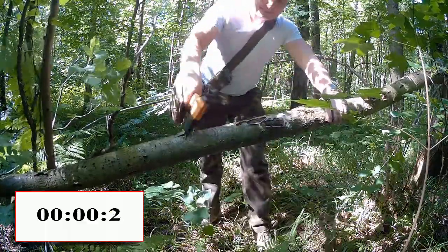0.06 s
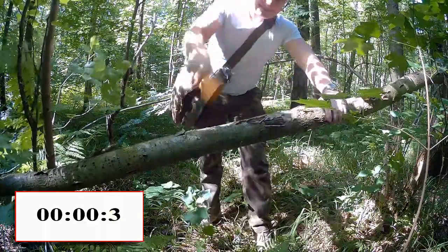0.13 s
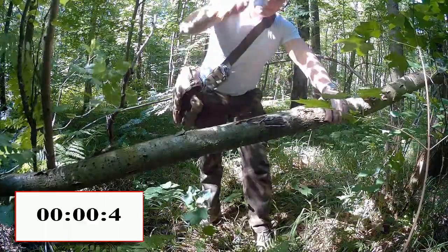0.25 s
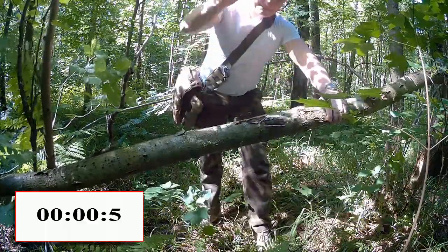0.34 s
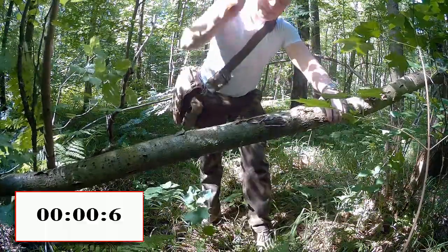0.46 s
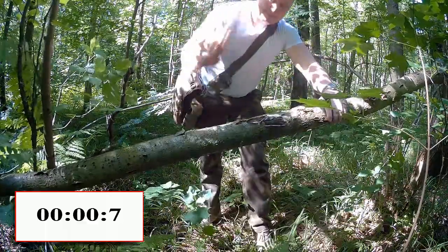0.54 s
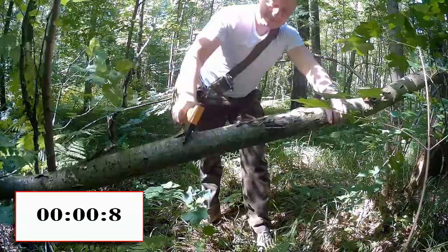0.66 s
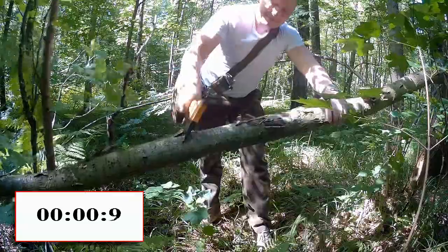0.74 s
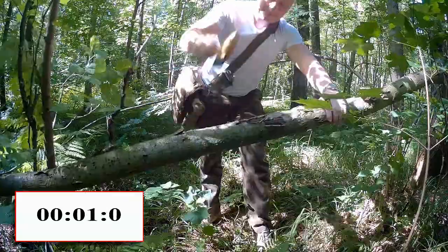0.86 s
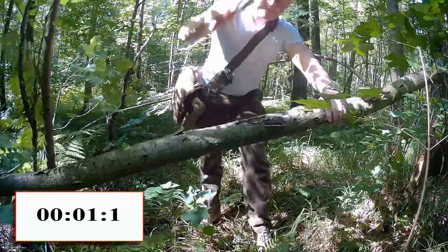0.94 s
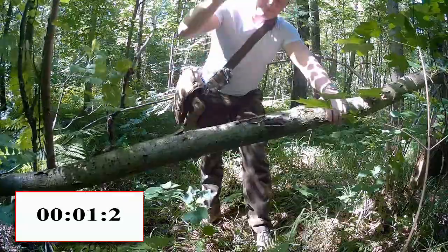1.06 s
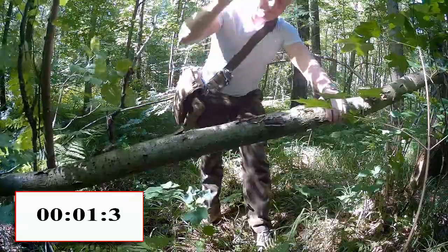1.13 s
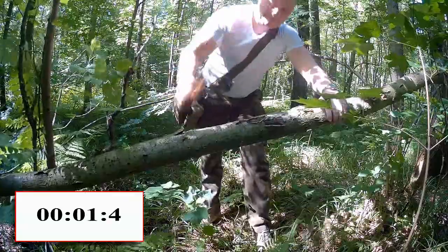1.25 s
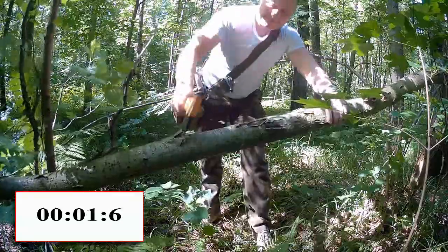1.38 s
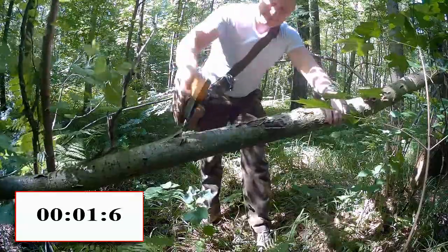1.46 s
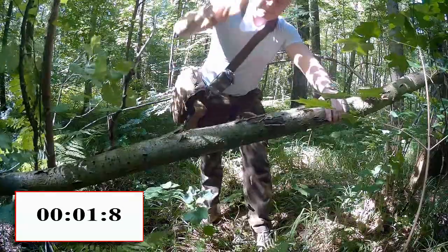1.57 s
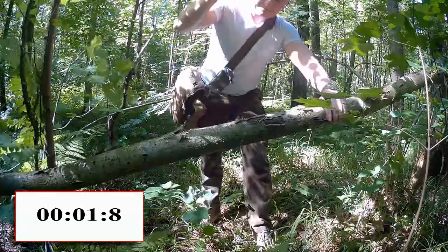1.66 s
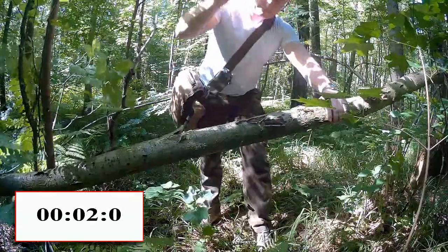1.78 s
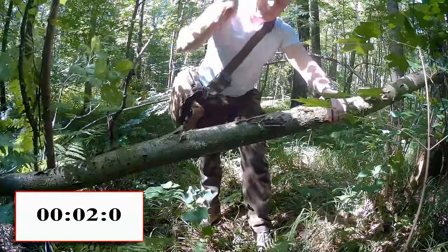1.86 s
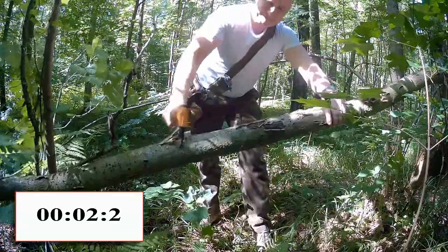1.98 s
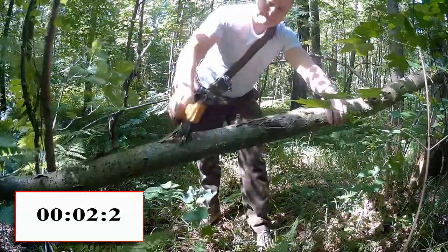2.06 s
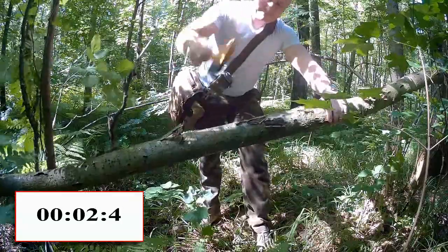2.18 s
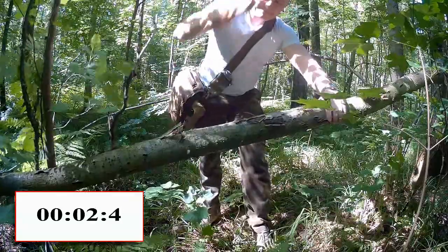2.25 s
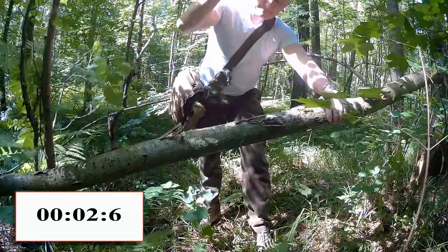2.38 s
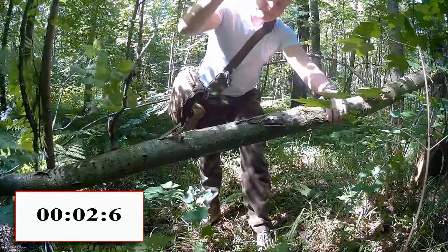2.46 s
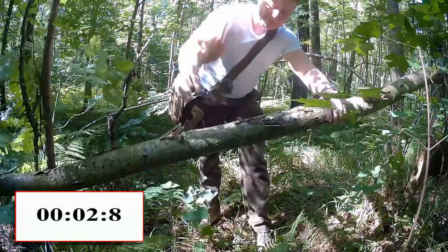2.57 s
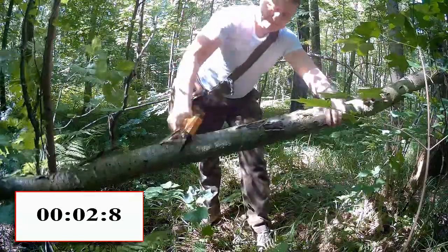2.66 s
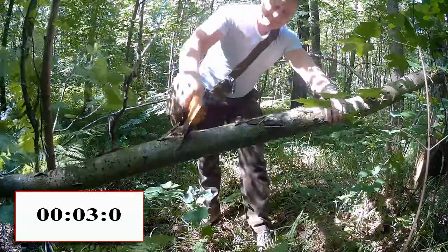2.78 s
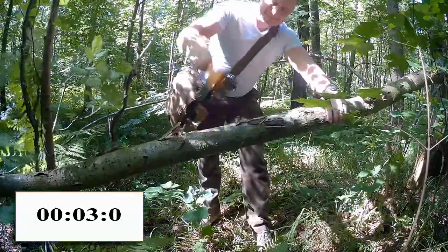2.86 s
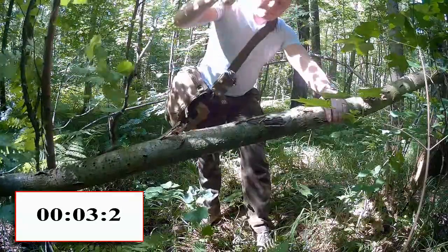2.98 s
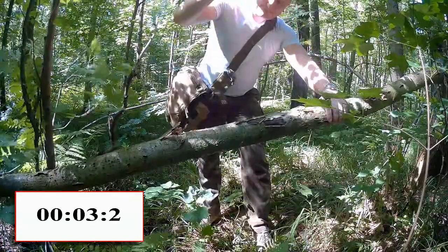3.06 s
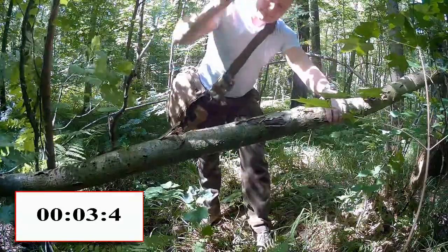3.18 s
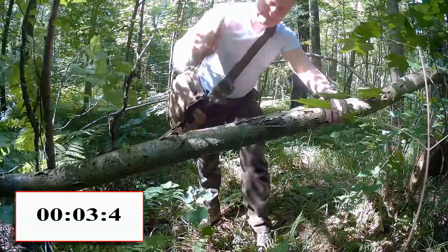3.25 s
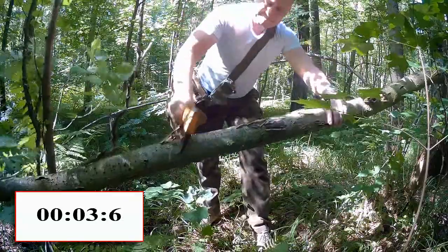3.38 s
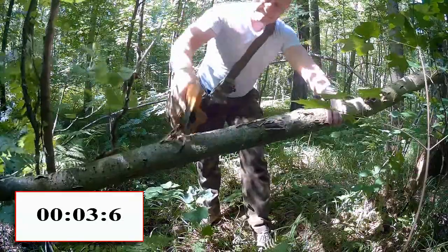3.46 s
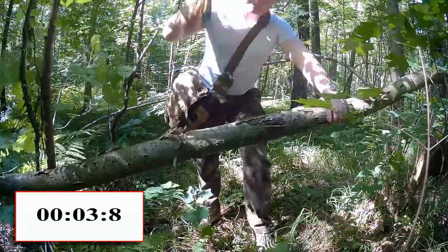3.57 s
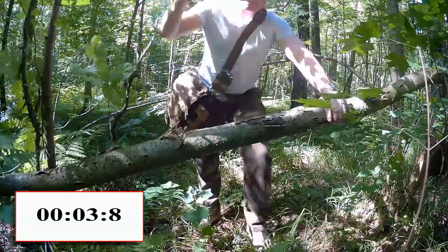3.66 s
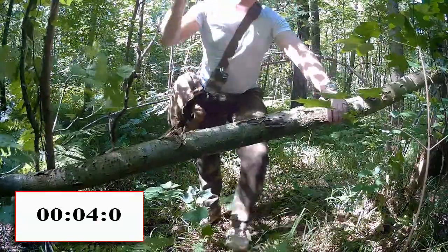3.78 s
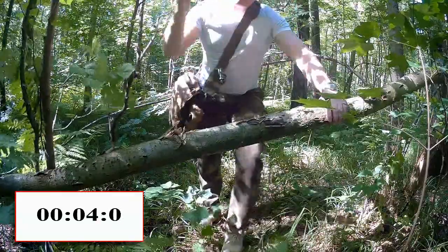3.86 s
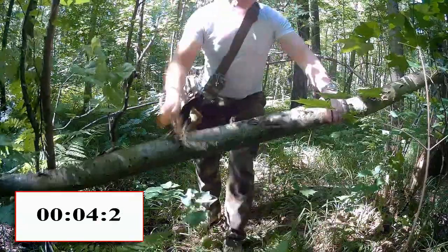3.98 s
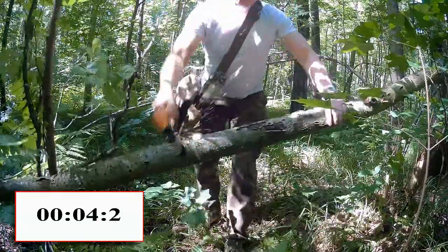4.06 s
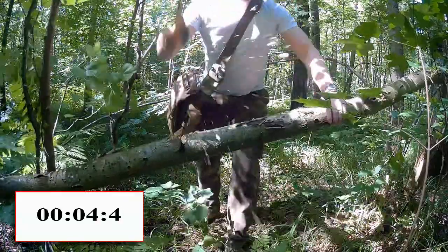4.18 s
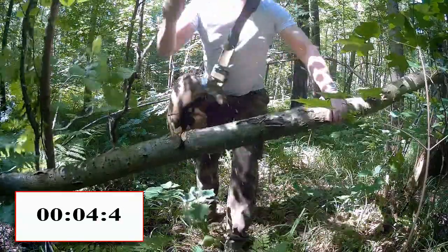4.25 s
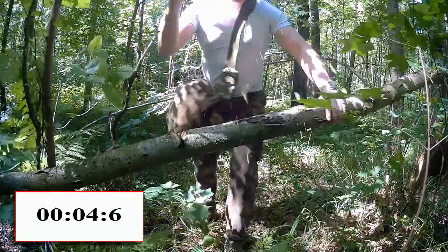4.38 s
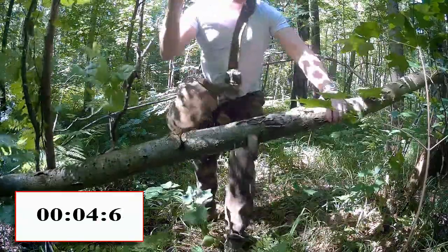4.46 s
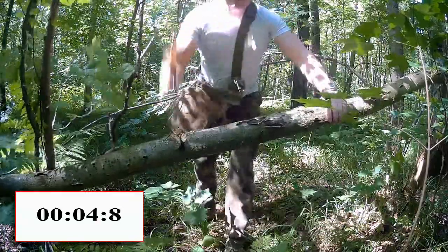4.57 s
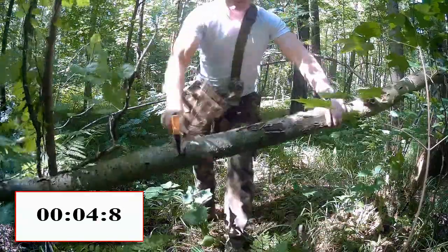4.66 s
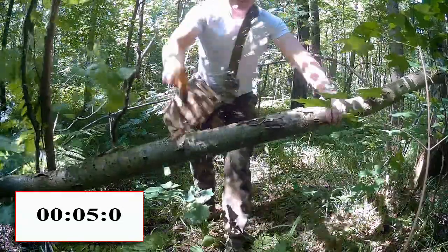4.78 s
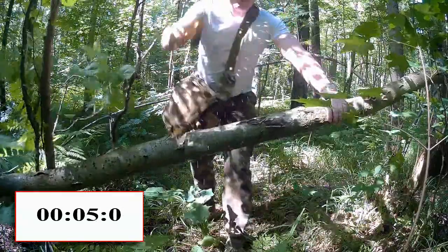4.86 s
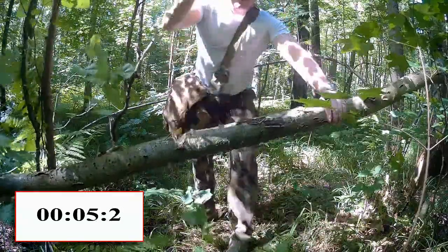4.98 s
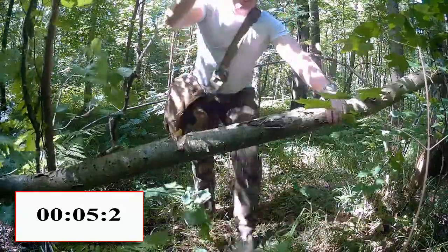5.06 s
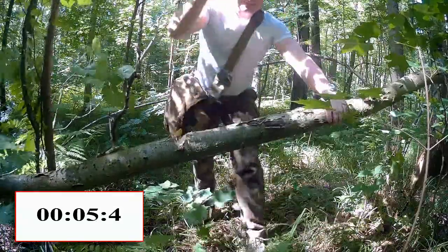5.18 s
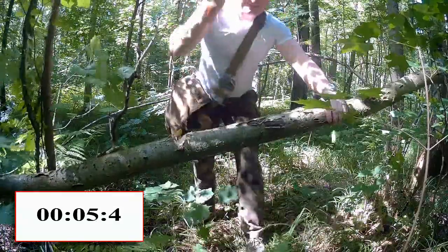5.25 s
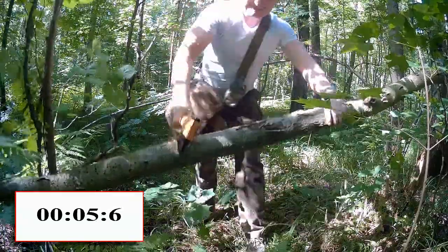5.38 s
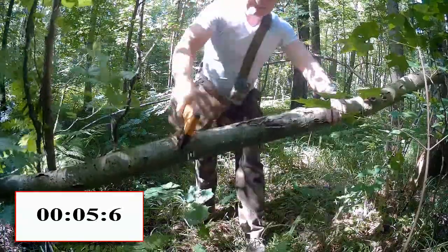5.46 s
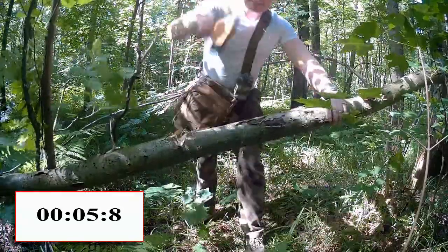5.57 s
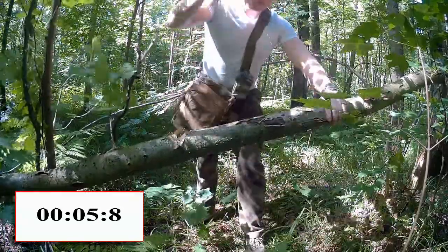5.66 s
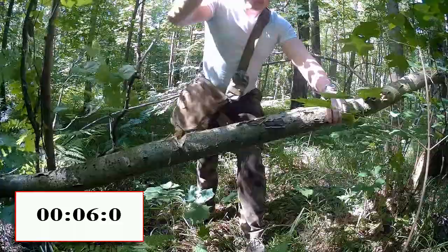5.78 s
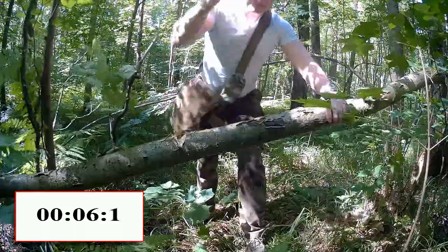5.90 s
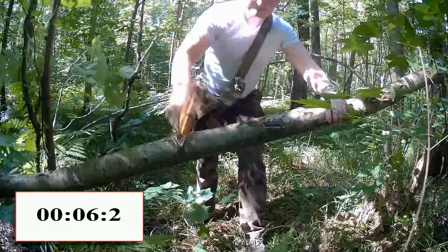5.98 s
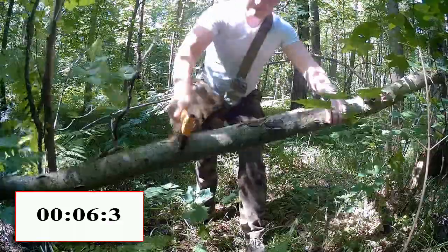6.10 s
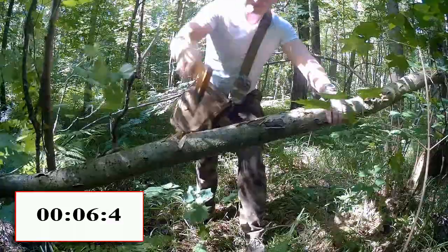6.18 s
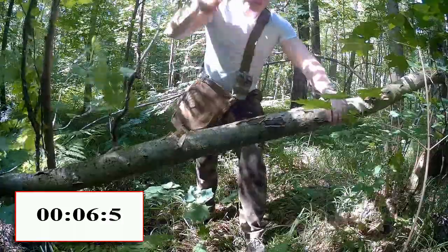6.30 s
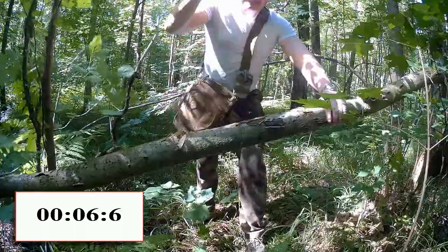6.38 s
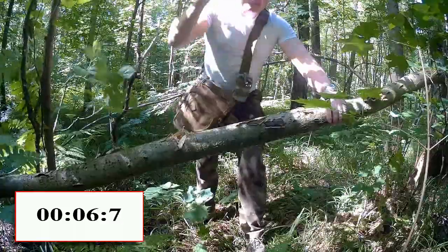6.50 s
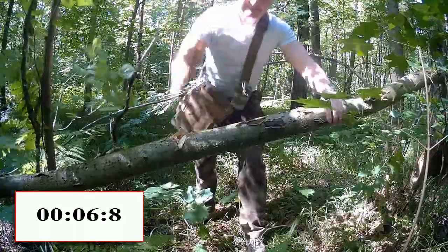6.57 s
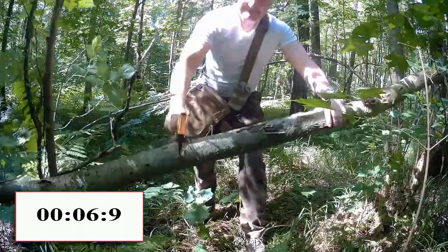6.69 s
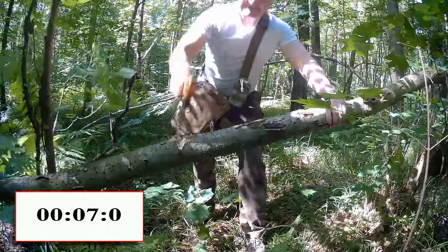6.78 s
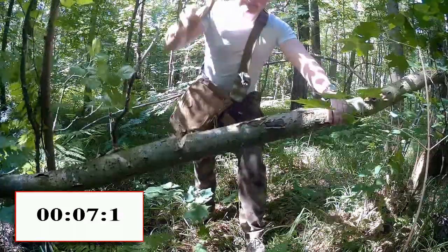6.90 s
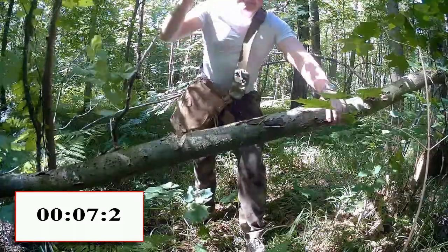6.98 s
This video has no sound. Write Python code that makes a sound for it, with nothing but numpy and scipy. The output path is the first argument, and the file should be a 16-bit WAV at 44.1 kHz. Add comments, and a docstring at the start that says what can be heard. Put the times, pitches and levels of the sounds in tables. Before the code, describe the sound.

In a quiet forest, a hatchet hits a fallen log close to a small camera microphone. The echo of an earlier blow fades first, then ten regular cracking knocks follow, loud enough to distort and briefly duck the sound. Trunks echo each blow, leaves crackle, and chips tick into the litter over faint air, distant traffic hum and a thin high pulsing tone.

```python
"""Forest floor, a small camera's microphone close to a fallen log: an earlier blow is still dying away at the start.
Air, a far traffic hum and a thin pulsing tone run throughout. From 0.6 s a hatchet lands ten blows, about 0.7 s apart.
Each cracks the wood and rings the log's damped modes; then noise echoes among the trunks and the leaves crackle.
Chips land in the litter as short bursts. The blows overload the microphone and its gain ducks a moment late."""
import sys
import numpy as np
from scipy import signal
from scipy.fft import rfft, irfft, next_fast_len
from scipy.io import wavfile
from scipy.ndimage import uniform_filter1d

SR = 44100
rng = np.random.default_rng(int(sys.argv[2]) if len(sys.argv) > 2 else 0)


def file_out(sig):
    """Save sig as 16-bit WAV at sys.argv[1]."""
    # one column per channel
    cols = np.atleast_2d(sig).T
    # limit, then scale
    lim = np.clip(cols, -1, 1)
    pcm = np.round(lim * 32767).astype(np.int16)
    wavfile.write(sys.argv[1], SR, pcm)


def magnitude_from_level(level_db):
    """Linear magnitude for a level in decibels (20 dB per decade)."""
    exponent = np.asarray(level_db, float) / 20
    return 10 ** exponent


N = 310023
T = np.arange(N) / SR


def unit(x):
    """Brings a sound to rms 1."""
    return x / np.sqrt(np.mean(x ** 2) + 1e-20)


def along(points, hz):
    """Reads (f/Hz, value) points on a log frequency axis."""
    f, v = np.transpose(points)
    return np.interp(np.log(hz + 1), np.log(f + 1), v)


def coloured(x, spectrum):
    """Filters x through a (f/Hz, level/dB) spectrum and brings it to rms 1."""
    size = next_fast_len(len(x) + 4096)
    gain = magnitude_from_level(along(spectrum, np.fft.rfftfreq(size, 1 / SR)))
    return unit(irfft(rfft(x, size) * gain, size)[:len(x)])


def patchy(size, patchy_db):
    """White noise with patches of random gain in time and frequency."""
    z = signal.stft(rng.standard_normal(size + 512), nperseg=256)[2]
    field = uniform_filter1d(rng.standard_normal(z.shape), size=5, axis=0)
    field = uniform_filter1d(field, size=9, axis=1)
    return signal.istft(z * magnitude_from_level(patchy_db * unit(field)), nperseg=256)[1][:size]


def add(out, s, sound):
    """Mixes a sound in from time s on, trimmed to the length of the scene."""
    i = round(s * SR)
    part = sound[max(-i, 0):][:N - max(i, 0)]
    out[max(i, 0):][:len(part)] += part


# Air of the forest all around: f/Hz, relative level/dB per Hz
AIR_SPECTRUM = [(15, -35), (25, 1), (65, -1.5), (110, -7), (300, -6.5), (550, -3.5), (900, -2),
                (1300, -5.5), (1750, -10), (2150, -16), (2900, -20), (3900, -15.5), (5000, -18),
                (8000, -21.5), (11300, -25.5), (15200, -32), (16500, -68)]


def forest_air():
    """Diffuse, slightly patchy noise, strongest in the lows."""
    return magnitude_from_level(-41) * coloured(patchy(N, patchy_db=1.03), AIR_SPECTRUM)


# Far traffic coming and going: t/s, hum level/dB
TRAFFIC_LEVEL = [(0, -47), (.5, -46), (1.1, -55.5), (1.7, -55.5), (2.4, -50), (3, -45), (3.5, -46.5),
                 (4.2, -62), (5, -48.5), (5.7, -55), (6.3, -48.5), (7.03, -59)]
# Colour of that hum: f/Hz, relative level/dB per Hz
HUM_SPECTRUM = [(100, -3.5), (140, 2.5), (175, 10), (215, 0), (280, -61.5)]


def far_traffic():
    """A low band of noise whose level rises and falls."""
    level = magnitude_from_level(np.interp(T, *np.transpose(TRAFFIC_LEVEL)))
    return level * coloured(patchy(N, patchy_db=-0.3), HUM_SPECTRUM)


# Thin high tone, a carrier between the side lines of its pulsing: f/Hz, rms level/dB
TONE_LINES = [(12780, -64.5), (12828, -55.5), (12877, -63.5)]


def thin_tone():
    """Three steady sines close in pitch beat together, so the tone pulses."""
    return sum(magnitude_from_level(db) * np.sqrt(2) * np.cos(2 * np.pi * hz * T) for hz, db in TONE_LINES)


def leaf_snaps(size, count, cycles, spread_db):
    """Tiny leaf snaps: damped sines of a few cycles at random times, pitches and sizes."""
    when, pitch, heft = rng.uniform(size=(3, count))
    hz, sample = 1800 * 5 ** pitch[:, None], np.arange(128)
    decay = np.exp(-hz * sample / SR / cycles)
    snaps = magnitude_from_level(spread_db * heft[:, None] ** 2) * decay * np.sin(2 * np.pi * hz * sample / SR)
    places = (when * size).astype(int)[:, None] + sample
    return unit(np.bincount(places.ravel(), snaps.ravel(), size + 128)[:size])


# Echo among the trunks before its decay: f/Hz, relative level/dB per Hz
ECHO_SPECTRUM = [(120, -55), (200, 9.5), (318, -13), (574, -9.5), (643, -4.5), (815, -7.5), (1050, -2),
                 (1860, -10), (3000, -40), (3900, -74), (6600, -120)]
# Decay among the trunks: f/Hz, t60/s
TRUNK_DECAY = [(250, 0.3), (600, 0.91), (1200, 1.066), (3000, 0.97)]


def trunk_echo(t):
    """The trunks answer a blow with patchy noise, each pitch dying at its own speed."""
    hz, frame, z = signal.stft(coloured(patchy(len(t), patchy_db=1.45), ECHO_SPECTRUM), SR, nperseg=512)
    fading = magnitude_from_level(-60 * frame / along(TRUNK_DECAY, hz)[:, None])
    echo = signal.istft(z * fading, SR, nperseg=512)[1][:len(t)]
    return echo * (1 + 1.9 * magnitude_from_level(-60 * t / 0.21))  # the nearest trunks answer first and loudest


# Shaken leaves: f/Hz, relative level/dB per Hz
LEAF_SPECTRUM = [(1060, 8), (1800, -2), (2860, 1), (3960, 6), (5040, -2), (8000, 1), (11400, -15.5),
                 (13200, -22), (15700, -50), (16500, -61)]


def shaken_leaves(t):
    """The leaves crackle as patchy noise and snaps, and settle."""
    snaps = .4 * leaf_snaps(len(t), count=700, cycles=1.3, spread_db=11)
    return magnitude_from_level(-60 * t / 1.517) * coloured(patchy(len(t), patchy_db=4.5) + snaps, LEAF_SPECTRUM)


# Bright echo, the crack come back: f/Hz, relative level/dB per Hz
WASH_SPECTRUM = [(1200, -3.5), (2000, 0.5), (2800, -1.5), (4000, 4.5), (5500, -3.5), (8000, -8.5),
                 (12000, -22.5)]


def bright_echo(t):
    """The crack comes back from the forest as bright, fading noise."""
    return magnitude_from_level(-60 * t / 0.55) * coloured(patchy(len(t), patchy_db=2.0), WASH_SPECTRUM)


# Blows close to the microphone: t/s, strength level/dB, hardness/dB per octave,
# crack level/dB, thin ring level/dB, bright echo level/dB
BLOWS_STRUCK = [(0.6044, -2.5, 4, 9.5, -12, -22.5), (1.318, -3.5, 4.5, 13.5, -40, -17.5),
                (1.9914, -0.9, -1.5, 14, -22, -21), (2.6724, -0.5, -2, 6.5, -30, -21),
                (3.342, -1, 2.5, 6, -36, -26.5), (4.0386, -13.5, 12.5, 15.5, -9.5, -16),
                (4.6561, -0.5, -5, 15, -7, -19.5), (5.384, -2, 1.5, 7, -13, -24.5),
                (6.0431, 3.5, -1, -0.5, -19, -27), (6.6658, 3.5, -5, 9.5, -20, -32.5)]
# The blow just before the start: t/s, bright echo level/dB
EARLIER_BLOW = (-0.27, -11)


def forest_answer():
    """After each blow the trunks echo it, dull and bright, and the shaken leaves crackle and settle."""
    echo_mean_db, leaves_start_db, scatter_db = -22.5, -35, 0.78 / 0.78 * 0.38
    leaves_rise_db_per_s = 0.78  # the leaves shake more as the cut deepens
    out, t = np.zeros(N), T[:SR + SR // 2]
    for s, wash_db in [EARLIER_BLOW, *[(blow[0], blow[-1]) for blow in BLOWS_STRUCK]]:
        echo_db = echo_mean_db + scatter_db * rng.standard_normal()
        leaves_db = leaves_start_db + leaves_rise_db_per_s * s + scatter_db * rng.standard_normal()
        slow = magnitude_from_level(echo_db) * trunk_echo(t) + magnitude_from_level(leaves_db) * shaken_leaves(t)
        wash = magnitude_from_level(wash_db) * bright_echo(t)
        add(out, s, slow * (1 - np.exp(-t / .015)) + wash * (1 - np.exp(-t / .012)))
    return out


# The clearest chips and twigs landing: t/s, crisp peak level/dB, dull thud level/dB over that, crispest f/Hz
CHIP_LANDINGS = [(0.0473, -28.5, 0, 4020), (0.1986, -34, -8, 3860), (0.984, -34, -16, 4170),
                 (1.051, -33, -14, 3200), (1.169, -32, -22, 3560), (1.54, -27, -25, 4040),
                 (1.782, -22.5, -5, 4150), (2.2463, -19.5, -19, 3580), (2.2882, -27.5, -1, 2240),
                 (2.876, -27, -14, 4200), (2.972, -23, -2, 3770), (3.1513, -30, -20, 4300),
                 (3.4557, -23.5, 2, 3870), (3.8744, -30, 3, 4120), (4.3134, -45, 24.5, 3880),
                 (4.3458, -25.5, -22, 3940), (4.571, -19, -6, 4400), (4.867, -23, 3, 2060),
                 (5.023, -25, -19, 4040), (5.1147, -18, -6.5, 7700), (5.217, -26, 0, 6900),
                 (5.2592, -26.5, -7, 4330), (5.7085, -32, -8, 3750), (6.1435, -20, 0, 3600),
                 (6.191, -28.5, 11.5, 6000), (6.3045, -27.5, 2, 5900), (6.772, -18.5, -4.5, 2280),
                 (6.826, -35, -13, 3870), (7.0133, -30.5, -13, 3400)]
# Crisp litter under the chips: f/Hz, relative level/dB per Hz
LITTER_SPECTRUM = [(1200, -3.5), (2500, 6.5), (4200, 2.5), (6000, 2.5), (8000, 3), (11000, -21),
                   (16000, -40)]
# A chip's dull knock: f/Hz, relative level/dB per Hz
KNOCK_SPECTRUM = [(350, -25), (750, -5), (1200, -4), (1600, -3.5), (2400, -32)]


def chips():
    """A chip lands as a short crisp burst, stressed at its own pitch, with a dull thud; crumbs fall between."""
    chip_t60_s = 0.022
    crumbs_per_s, crumb_db, crumb_spread_db, crumb_hz = 4, -37, 2.5, 4000  # faint bits at random times
    out, t = np.zeros(N), T[:SR // 20]
    crumbs = []
    for u, v, w in rng.uniform(-1, 1, size=(round(crumbs_per_s * N / SR), 3)):
        crumbs.append(((1 + u) * N / SR / 2, crumb_db + crumb_spread_db * v, -12, crumb_hz * 1.5 ** w))
    burst = magnitude_from_level(-60 * t / chip_t60_s) * (1 - np.exp(-t / .0015))
    for s, db, thud_db, hz in CHIP_LANDINGS + crumbs:
        ringing = [(hz * 0.8, 0), (hz, 11), (hz * 1.66, 0)]
        litter = coloured(rng.standard_normal(len(t)), LITTER_SPECTRUM)
        crisp = burst * coloured(litter, ringing)
        thud = burst * coloured(rng.standard_normal(len(t)), KNOCK_SPECTRUM)
        landing = crisp / np.abs(crisp).max() + magnitude_from_level(thud_db) * thud / np.abs(thud).max()
        add(out, s, magnitude_from_level(db) * landing)
    return out


# Fibres splitting under the edge: f/Hz, relative level/dB per Hz
SPLINTER_SPECTRUM = [(300, 7), (1200, 15.5), (2500, 5.5), (4200, 8), (8000, -2), (14000, -69)]


def wood_crack(t):
    """The fibres split as a burst of noise that fades faster once the splitting ends."""
    splitting_s = .0074
    fading_db = -60 * t / 0.034 - 60 * np.maximum(t - splitting_s, 0) / 0.024
    crack = magnitude_from_level(fading_db) * coloured(rng.standard_normal(len(t)), SPLINTER_SPECTRUM)
    return crack * (1 - np.exp(-t / .0012))


# Modes of the log: f/Hz, level/dB, t60/s
LOG_MODES = [(71, -22, 0.3), (135, -17, 0.23), (234, -18.5, 0.15), (304.8, -10.5, 0.14), (389.5, -6, 0.095),
             (511, -9.5, 0.1), (608.3, 0.5, 0.092), (659.3, 4.5, 0.08), (718, -2, 0.066), (856, 0.5, 0.073),
             (1075.4, 4, 0.051), (1220, 5, 0.027), (1460.4, 3.5, 0.025), (1797, 7, 0.0066)]
# The whole log shuddering: f/Hz, relative level/dB per Hz
THUD_SPECTRUM = [(40, -8), (130, -8), (330, -1.5), (640, 8), (850, -3.5), (1300, -33)]


def log_ring(t, hardness):
    """A jolting contact rings the log's damped modes roughly, and the whole log shudders on."""
    modes = np.zeros(len(t))
    for hz, level, t60 in LOG_MODES:
        tilt_db = hardness * np.log2(max(hz, 500) / 640)  # a hard blow rings higher
        size = magnitude_from_level(level + tilt_db + rng.normal(0, 1.01) - 60 * t / t60)
        modes += size * np.sin(2 * np.pi * (hz * rng.normal(1, 0.021) * t + rng.uniform()))
    # contact chatter and returns from the ground and near trunks, after one strong first jolt
    jolts = rng.standard_normal(len(t)) * magnitude_from_level(-60 * t / 0.022)
    jolts[0] = 1.7 * np.linalg.norm(jolts)
    ring = signal.fftconvolve(modes, jolts / np.linalg.norm(jolts))[:len(t)]
    ring *= 1 + 2.3 / (1 + (t / 0.0024) ** 4)  # driven hardest while the blade is still wedging in
    return ring + magnitude_from_level(-6.5 - 60 * t / 0.2) * coloured(rng.standard_normal(len(t)), THUD_SPECTRUM)


# A lightly damped mode that only some blows reach: f/Hz, t60/s
THIN_MODE = (550, .27)


def hatchet():
    """The edge bites and cracks the fibres; a moment later the log rings, with a thin mode over it."""
    edge_lead_s = 0.00064
    thin_hz, thin_t60 = THIN_MODE
    out, t = np.zeros(N), T[:SR // 3]
    for s, db, hardness, crack_db, thin_db, _ in BLOWS_STRUCK:
        ring = magnitude_from_level(db) * log_ring(t, hardness)
        thin = magnitude_from_level(thin_db - 60 * t / thin_t60) * np.sin(2 * np.pi * thin_hz * t)
        add(out, s, magnitude_from_level(crack_db) * wood_crack(t))
        add(out, s + edge_lead_s, (ring + thin) * (1 - np.exp(-t / .0006)))
    return out


def scene():
    """Sums the layers from the far background to the hatchet, as one channel."""
    background = forest_air() + far_traffic() + thin_tone()
    return (background + forest_answer() + chips() + hatchet())[None]


def gain_control(x, loud=.45, late_s=.019, depth_db=11.5, back_db_per_s=100, hold_s=.042):
    """Overload turns the gain down after a delay; it holds, then climbs back at a steady rate."""
    last_loud = np.maximum.accumulate(np.where(np.abs(x) > loud, T, -9))
    quiet_before = last_loud - np.r_[-9, last_loud[:-1]] > hold_s
    first_loud = np.maximum.accumulate(np.where(quiet_before & (last_loud == T), T, -9))
    since = T - first_loud - late_s
    climbing_db = np.clip(depth_db - back_db_per_s * np.maximum(since - hold_s, 0), 0, None)
    cut_db = np.where(since > 0, climbing_db, 0)
    return magnitude_from_level(-uniform_filter1d(cut_db, round(.014 * SR)))  # the steps are smoothed


def band_limit(x):
    """A steep low-pass at the top of the band."""
    return signal.sosfilt(signal.butter(12, 16640, fs=SR, output="sos"), x)


def record(dry):
    """Late gain control, then hard clipping; the top treble dulls around each overload; the input coupling lets
    flat tops sag."""
    x = dry * gain_control(dry[0])
    overload = uniform_filter1d(1. * (np.abs(x) > .5), round(.012 * SR)) > 0
    clipped = x / (1 + np.abs(x / 0.62) ** 12) ** (1 / 12)
    dull = signal.sosfiltfilt(signal.butter(10, 8600, fs=SR, output="sos"), clipped)
    top = signal.sosfiltfilt(signal.butter(10, 15200, fs=SR, output="sos"), clipped - dull)
    dulling_db = -17 * uniform_filter1d(1. * overload, round(0.0051 * SR))
    x = dull + top * magnitude_from_level(dulling_db)
    x = signal.lfilter(*signal.butter(1, 28, "high", fs=SR), x)
    return band_limit(x)


dry = scene()
out = record(dry)
file_out(out)
```